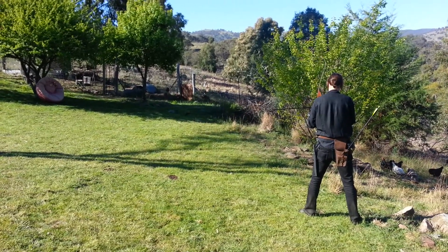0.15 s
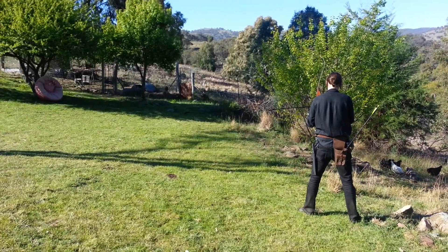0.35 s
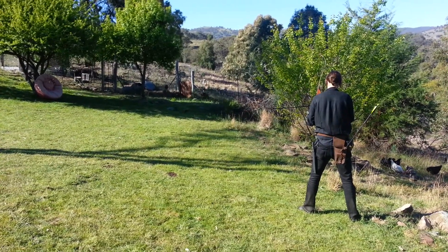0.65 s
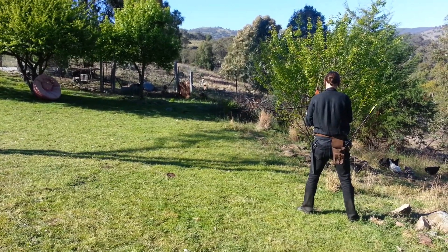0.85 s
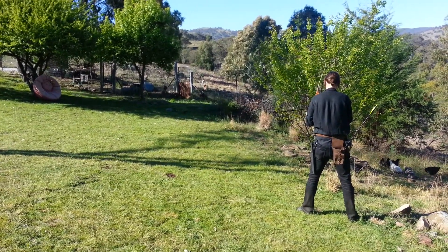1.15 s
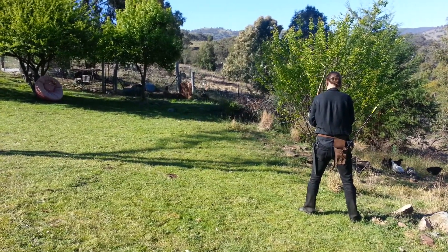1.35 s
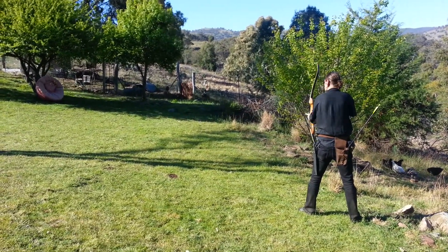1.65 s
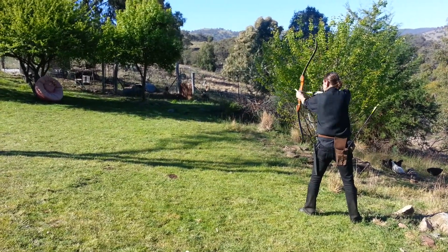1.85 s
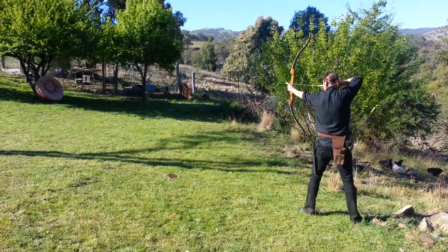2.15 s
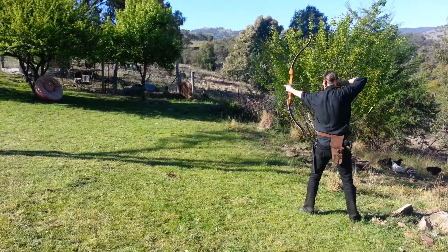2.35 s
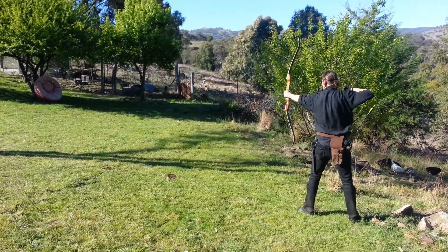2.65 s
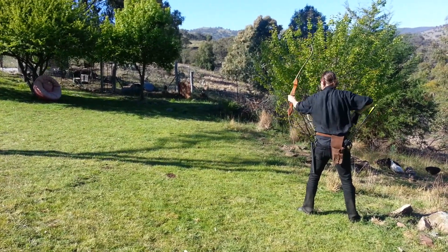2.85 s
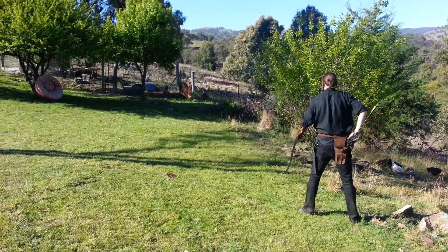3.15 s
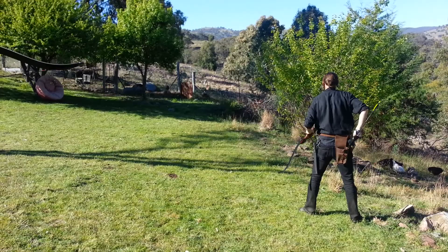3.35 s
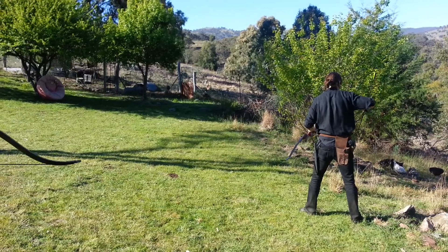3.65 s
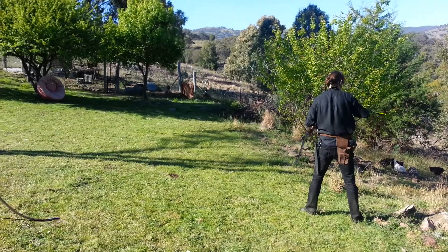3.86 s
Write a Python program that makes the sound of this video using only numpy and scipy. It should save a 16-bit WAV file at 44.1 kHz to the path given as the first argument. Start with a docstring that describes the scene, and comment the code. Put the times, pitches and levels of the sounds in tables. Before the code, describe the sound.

An arrow is shot outdoors: following soft rustles, it clatters past the bow, hisses away and cracks into a target with a slight echo. Wind rises around the shot and keeps rumbling and popping on the microphone.

```python
"""An archer on a lawn looses one arrow: the string slips, and the shaft clatters past the bow,
rings in its bending modes and hisses away. Its impact excites the target's face (a crack) and
body (a thud); trees scatter the sounds of bow and target back. Faint close rustling and a far
tone come first, while a breeze rises and its eddies buffet each microphone port in turn."""
import sys
import numpy as np
from scipy import signal
from scipy.fft import rfft, irfft, next_fast_len
from scipy.io import wavfile
from scipy.ndimage import uniform_filter1d, map_coordinates

SR = 44100
rng = np.random.default_rng(int(sys.argv[2]) if len(sys.argv) > 2 else 0)


def unload_audio(sound):
    """Save the sound as a 16-bit wav file, at the path given as the first command line argument."""
    columns = np.transpose(np.atleast_2d(sound))
    # keep every value between -1 and 1, then stretch to whole-number steps
    steps = np.round(np.clip(columns, -1, 1) * 32767)
    wavfile.write(sys.argv[1], SR, steps.astype(np.int16))


N = 176400
T = np.arange(N) / SR
SIDE = np.array([[.5], [-.5]])  # left and right shares of a difference between the ports

# friction hiss of string, shaft and feathers: frequency_hz, level_db
SIZZLE_SPECTRUM = [(1000, -46), (3000, -7), (5600, 0.5), (7300, -1), (8400, -10), (10500, -17),
                   (15000, -27)]


def amp(db):
    """Amplitude ratio of a level."""
    return 10 ** (np.asarray(db) / 20)


def unit(x):
    """Normalisation to rms 1."""
    return x / np.sqrt(np.mean(x ** 2) + 1e-20)


def along(points, hz):
    """Interpolation on a log frequency axis."""
    f, v = np.transpose(points)
    return np.interp(np.log(hz + 1), np.log(f + 1), v)


def curves(rows):
    """Linear interpolation in time of each column after the first."""
    s, *cols = np.transpose(rows)
    return np.array([np.interp(T, s, c) for c in cols])


def filtered(x, response):
    """Filtering as multiplication of the spectrum."""
    m = next_fast_len(N + SR // 2)
    return irfft(rfft(x, m) * response(np.fft.rfftfreq(m, 1 / SR)), m)[..., :N]


def butter(x, hz, kind, order=2):
    """A causal low-pass or high-pass."""
    return signal.sosfilt(signal.butter(order, hz, kind, fs=SR, output="sos"), x)


def noise(spectrum, channels=1):
    """Coloured noise of rms 1, incoherent between channels."""
    return unit(filtered(rng.standard_normal((channels, N)), lambda hz: amp(along(spectrum, hz))))


def wobble(knots_per_s):
    """Smooth random modulation."""
    return map_coordinates(rng.standard_normal(N // 8), [T * knots_per_s])


def burst(s, rise_s, t60_s):
    """A bell-shaped rise to the peak at s, then exponential decay."""
    return np.exp(-(np.minimum(T - s, 0) / rise_s) ** 2) * amp(-60 * np.maximum(T - s, 0) / t60_s)


def ring(s, modes, rise_s):
    """Free vibration of damped modes struck at s."""
    t = np.maximum(T - s, 0)
    vibration = sum(amp(db - 60 * t / t60) * np.sin(2 * np.pi * hz * t) for hz, db, t60 in modes)
    return vibration * (1 - np.exp(-t / rise_s))


def placed(x, pan_db, lead_ms):
    """Direction as level and time differences, left port over right."""
    return amp(SIDE * pan_db) * filtered(x, lambda hz: np.exp(2j * np.pi * hz * SIDE * lead_ms * 1e-3))


def two_ports(spectrum, lead_ms):
    """Partial coherence: noise common to both ports plus a weaker independent part."""
    return unit(placed(noise(spectrum), 0, lead_ms) + amp(-1.5) * noise(spectrum, channels=2))


def rustle():
    """Amplitude-modulated noise: grainy swishes and dull scuffs close by, over still air."""
    # faint rustles: peak_s, rise_s, t60_s, level_db
    swish_events = [(.005, 0.015, 0.76, -52.5), (.059, 0.0015, 0.2, -49), (.13, 0.015, 0.15, -56),
                    (.345, 0.029, 0.31, -57.5), (.395, 0.042, 0.32, -53), (.71, 0.015, 0.15, -57.5),
                    (.89, 0.062, 0.26, -59), (1.028, 0.0056, 0.13, -47.5), (1.11, 0.041, 0.34, -55),
                    (1.175, 0.0076, 0.31, -58.5), (1.45, 0.019, 0.15, -59), (2.074, 0.012, 0.16, -47.5),
                    (2.48, 0.01, 0.16, -55.5)]
    # soft scuffs: peak_s, level_db
    scuff_events = [(.03, -57.5), (1.29, -65), (1.435, -58)]
    # spectra of the three noises: frequency_hz, level_db
    swish_spectrum = [(80, -16.5), (300, 1.5), (600, -10.5), (1200, -3.5), (5000, -4), (6800, 2),
                      (8500, -11), (13000, -12), (15000, -22)]
    scuff_spectrum = [(100, -20), (270, -2), (450, -16), (2000, -65)]
    air_spectrum = [(40, -22), (100, -3), (300, 1), (600, -18), (1400, -9.5), (3500, -10.5), (7000, -8),
                    (9000, -15), (15000, -17.5)]
    swishes = sum(amp(db) * burst(s, rise, t60) for s, rise, t60, db in swish_events)
    swishes = swishes * amp(1.2 * wobble(300)) * two_ports(swish_spectrum, lead_ms=-.23)
    scuffs = sum(amp(db) * burst(s, rise_s=.013, t60_s=.21) for s, db in scuff_events)
    return swishes + scuffs * noise(scuff_spectrum) + amp(-65) * noise(air_spectrum, channels=2)


def wind():
    """Convected turbulence: stronger wind sweeps eddies past a port faster, so louder and higher."""
    # breeze at both ports: time_s, level_db
    breeze = [(0, -71), (.8, -79), (1.1, -72), (1.38, -85), (1.55, -68), (1.8, -76), (2.04, -70),
              (2.15, -53), (2.42, -51), (2.58, -37), (2.66, -28), (2.84, -34), (2.92, -30), (3.26, -37),
              (3.5, -29), (3.7, -34), (3.88, -40), (4, -36)]
    # gusts and single hard eddies: time_s, level_db, port (0 left, 1 right)
    gusts = [(.466, -54, 1), (1.048, -50, 1), (1.103, -45.5, 1), (1.544, -39, 1), (1.697, -34, 1),
             (1.722, -35, 1), (1.934, -32.5, 1), (1.963, -36, 1), (2.142, -38, 1), (2.176, -35.5, 1),
             (2.31, -34, 1), (2.343, -31.5, 1), (2.493, -30, 0), (2.561, -22, 1), (2.622, -26, 0),
             (2.657, -17, 1), (2.701, -19, 0), (2.722, -13.5, 0), (2.744, -21.5, 1), (2.777, -12, 0),
             (2.813, -21, 0), (2.984, -21, 0), (3.06, -20, 0), (3.112, -15.5, 0), (3.182, -20, 0),
             (3.215, -23, 0), (3.321, -15, 0), (3.36, -14, 0), (3.428, -21, 0), (3.45, -16, 1),
             (3.495, -21, 1), (3.542, -18, 1), (3.595, -21, 1), (3.62, -19, 1), (3.657, -21, 0),
             (3.745, -21.5, 0), (3.802, -19, 0), (3.816, -11.5, 0)]
    pops = [(2.654, -9.5, 1), (2.7153, -4, 0), (2.782, -6, 0), (2.937, -9.5, 1), (3.025, -9.5, 0),
            (3.098, -8, 0), (3.3205, -4.5, 0), (3.353, -3, 0), (3.4374, 0.5, 1), (3.8211, 2, 0)]
    # eddies before the sweep shifts their pitch, and wind hiss: frequency_hz, level_db
    eddy_spectrum = [(25, -30), (70, -0.5), (130, 2), (250, -3.5), (400, -13.5), (600, -28.5), (1000, -53),
                     (2000, -71), (5000, -110)]
    hiss_spectrum = [(60, -11.5), (300, 5.5), (700, 4), (1300, -5), (3500, -8), (7000, -7.5), (8500, -15),
                     (15000, -23)]
    # relative speed of the eddies: left_ratio, right_ratio
    port_speed = [1.1, .78]
    reference_db, db_per_octave, gust_width_s = -22, 32, .0095
    flutter_db = 3 * np.array([wobble(44.67), wobble(44.67)])
    power = amp(curves(breeze) + flutter_db) ** 2
    for s, db, port in gusts:
        power[round(port)] += amp(db) ** 2 * (1 + ((T - s) / gust_width_s) ** 2 / 4) ** -4
    strength_db = 10 * np.log10(power) - reference_db
    travel = np.cumsum(.12 + .88 * 2 ** (strength_db / db_per_octave), axis=1) * np.c_[port_speed]
    eddies = noise(eddy_spectrum, channels=2)
    local_power = np.abs(uniform_filter1d(eddies ** 2, size=1100, axis=1))
    eddies = eddies / np.sqrt(local_power + .027)  # evened out, so the wind sets the level
    swept = np.array([map_coordinates(e, [d], mode="wrap") for e, d in zip(eddies, travel)])
    buffet = np.sqrt(power) * swept
    for s, db, port in pops:
        pulse = ring(s, [(158, 0, .0087)], rise_s=.0001)
        edge_hz = 1220 * 2 ** (db / 8)  # weaker pops are rounder
        buffet[round(port)] += amp(db) * 2 * butter(pulse, edge_hz, "low", order=4)
    hiss_db = -48.5 + .31 * uniform_filter1d(strength_db.max(axis=0), size=900)
    return buffet + amp(hiss_db) * noise(hiss_spectrum, channels=2)


def whine():
    """Frequency and amplitude modulation: a faint far tone wavers, sags and fades."""
    # course of the tone: time_s, pitch_hz, level_db
    course = [(0.1, 1114, -71), (.22, 1110, -86), (.39, 1114, -72), (.52, 1109, -88), (1.07, 1040, -75),
              (1.5, 957, -89)]
    hz, db = curves(course)
    envelope = amp(db + 1.8 * wobble(21.2))
    phase = 2 * np.pi * np.cumsum(hz + 5 * wobble(40.4)) / SR
    return envelope * unit(np.sin(phase))


def flight():
    """Friction and flow noise: the string slides off the fingers and the feathers hiss away."""
    # hiss of string and feathers: time_s, level_db
    hiss_levels = [(2.52, -84), (2.537, -50), (2.57, -50), (2.66, -55), (2.75, -55), (2.81, -53),
                   (2.827, -47.5), (2.845, -54), (2.87, -49), (2.9, -62)]
    return amp(curves(hiss_levels) + 1.7 * wobble(120)) * noise(SIZZLE_SPECTRUM, channels=2)


def bow():
    """Contact noise: string and shaft scrape and clatter along the bow; slaps ring the shaft."""
    # contacts at the release: peak_s, t60_s, clatter_db, sizzle_db
    contacts = [(2.5493, 0.012, -30, -27), (2.553, 0.012, -32, -48), (2.580, 0.076, -29, -35),
                (2.5928, 0.02, -17, -28), (2.5958, 0.016, -23, -11), (2.6006, .014, -23, -18),
                (2.609, .02, -27, -22), (2.613, 0.02, -17, -22), (2.6205, .055, -18, -21.5),
                (2.642, .012, -30, -27)]
    # colour of the clatter: frequency_hz, level_db
    clatter_spectrum = [(400, -22), (900, -5), (1150, -13.5), (1600, -7), (2400, -1.5), (3050, -3),
                        (3700, -15.5), (5500, -11.5), (8000, -40), (12000, -55)]
    # the shaft slaps the bow: start_s, level_db
    slaps = [(2.591, -21.5), (2.612, -19), (2.620, -12.5)]
    rise_s = .0008
    clatter = sum(amp(db) * burst(s, rise_s, t60) for s, t60, db, _ in contacts)
    sizzle = sum(amp(db) * burst(s, rise_s, t60) for s, t60, _, db in contacts)
    scrape = clatter * noise(clatter_spectrum) + sizzle * two_ports(SIZZLE_SPECTRUM, lead_ms=0)
    shaft = sum(amp(db) * shaft_ring(s) for s, db in slaps)
    grain = amp(-5.5 + 2.24 * wobble(700))
    direct = placed(scrape * grain + shaft, pan_db=3, lead_ms=.054)
    return direct + amp(-12.5) * garden(direct)


def garden(x):
    """Reverberation: trees and ground scatter a thin tail whose treble decays first."""
    # decay of the tail: frequency_hz, t60_s
    decay_times = [(900, 0.6), (2500, 0.43), (14000, 0.12)]
    # its colour: frequency_hz, gain_db
    colour = [(400, -1), (850, 9.5), (1600, 10.5), (2400, -10), (4000, 1.5), (7000, 4.5)]
    hz, t, spectra = signal.stft(rng.standard_normal((2, SR // 2)), SR, nperseg=256)
    envelope = amp(-60 * t / along(decay_times, hz)[:, None]) * (1 - np.exp(-t / .0023))
    tail = signal.istft(spectra * envelope, SR, nperseg=256)[1]
    wet = signal.fftconvolve(x, tail / np.linalg.norm(tail[0]), axes=1)[:, :N]
    return filtered(wet, lambda hz: amp(along(colour, hz)))


def shaft_ring(s):
    """Damped bending modes after a slap; the flexing shaft unsettles the phase of each."""
    # modes of the shaft: pitch_hz, level_db, t60_s
    modes = [(900, -23, .12), (2336, 2, 0.058), (2500, -8, 0.063), (2676, -9, 0.067)]
    wander_rad = .45
    t = np.maximum(T - s, 0)
    vibration = sum(amp(db - 60 * t / t60) * np.sin(2 * np.pi * hz * t + wander_rad * wobble(90))
                    for hz, db, t60 in modes)
    return vibration * (1 - np.exp(-t / .0026))


def target():
    """Impact excitation: the face cracks, the body thuds, and nearby things reflect the crack."""
    # the point breaks through the layers and stops: start_s, level_db
    strikes = [(2.8661, -7.5), (2.8671, -14), (2.8679, -9), (2.8756, -26)]
    # modes of the face and body: pitch_hz, level_db, t60_s
    face_modes = [(810, -3, 0.012), (1410, -4, 0.0067), (1820, -3, 0.0097), (4220, -4, 0.0047),
                  (7140, -11.5, 0.007)]
    body_modes = [(141, -24, 0.036), (205, -6, 0.043)]
    # crunch of the last layer: frequency_hz, level_db
    crunch_spectrum = [(350, -23), (800, 7), (2000, -5), (4600, -1), (7300, -2.5), (8700, -14),
                       (12000, -28)]
    # diffuse reflections: delay_s, t60_s, level_db
    reflections = [(.009, 0.075, -16), (0.053, 0.09, -24.5), (0.073, .06, -25)]
    face = sum(amp(db) * ring(s, face_modes, rise_s=.00005) for s, db in strikes)
    crunch = amp(-13.5) * burst(strikes[-2][0], rise_s=.00074, t60_s=.012) * noise(crunch_spectrum)
    crack = butter(face, 666, "high") + crunch
    thud = ring(2.8674, body_modes, rise_s=.00041)
    direct = placed(crack + thud, pan_db=1.5, lead_ms=-.19)
    echo_envelope = sum(amp(db) * unit(burst(s, .0043, t60)) for s, t60, db in reflections)
    scatter = echo_envelope * rng.standard_normal((2, N)) / np.sqrt(N)
    echoes = signal.fftconvolve(crack, scatter, axes=1)[:, :N]
    return direct + echoes + amp(-29.5) * garden(direct)


def scene():
    """Superposition of the shot, the wind and the faint background."""
    return bow() + flight() + target() + wind() + rustle() + whine()


def record(dry):
    """Transduction: each port colours the sound; the microphone limits the band and rounds peaks."""
    # imbalance of the ports: frequency_hz, left_over_right_db
    colour = [(500, -0.5), (1300, 4), (2400, 7.5), (4400, 4.5), (7000, -6.5), (14000, 1)]
    low_hz, top_hz, ceiling = 42, 14850, .88
    x = filtered(dry, lambda hz: amp(SIDE * along(colour, hz)) * hz ** 3 / np.hypot(hz ** 3, low_hz ** 3))
    x = x / (1 + (x / ceiling) ** 6) ** (1 / 6)
    return filtered(x, lambda hz: hz < top_hz)


dry = scene()
out = record(dry)
unload_audio(out)
```